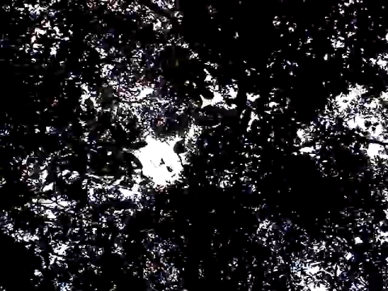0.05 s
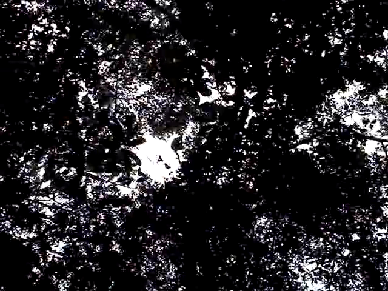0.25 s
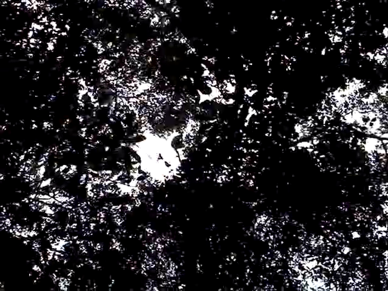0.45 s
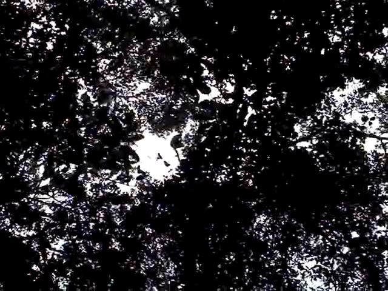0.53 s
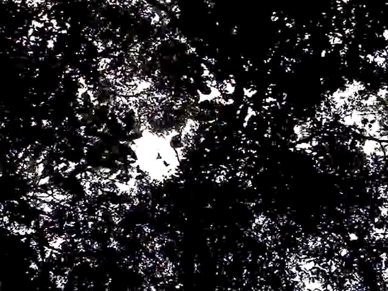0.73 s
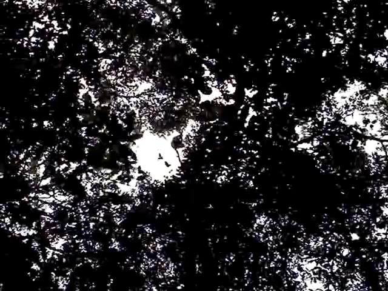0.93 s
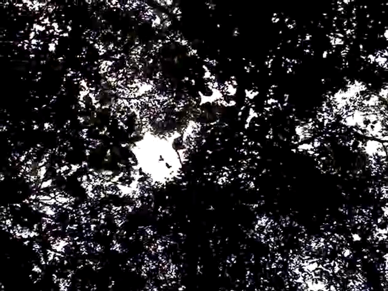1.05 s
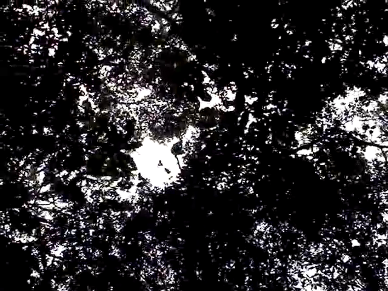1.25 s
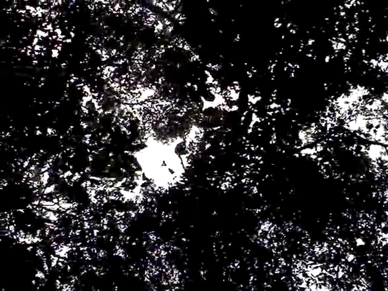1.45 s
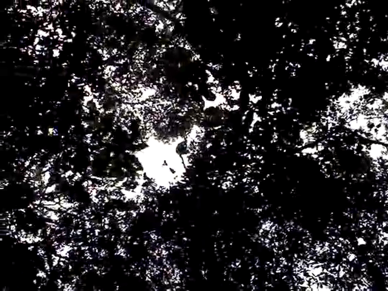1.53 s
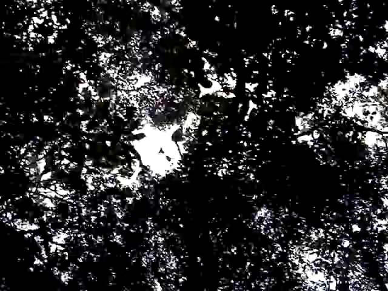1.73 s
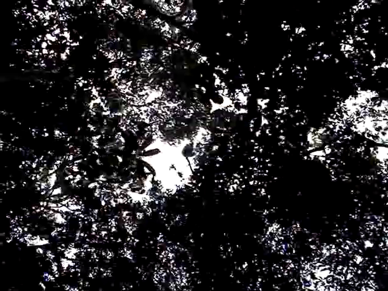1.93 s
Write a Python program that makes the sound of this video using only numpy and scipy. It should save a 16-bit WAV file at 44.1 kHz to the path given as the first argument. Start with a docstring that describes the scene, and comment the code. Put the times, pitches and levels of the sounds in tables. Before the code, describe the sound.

A lemur's loud, horn-like wail fills a quiet forest. Faint distant lemur calls fade at the start, and a sharp handling click comes at 0.2 seconds. The wail scoops up at about 0.4 seconds, holds one note, swells and lifts near 1.6, then breaks off, leaving an echo among the trees. From 1.7 seconds, small clicks and soft finger rubbing sound on the camera.

```python
"""An indri wails in a rain forest

An indri (a large lemur) gives one horn-like wail: it scoops up, holds its note, lifts and breaks off.
The trees scatter it into a long tail, and the calls of far indris linger over a soft forest hush.
A hand-held camera clicks and knocks a few times, and near the end fingers rub its casing."""
import sys
import numpy as np
from scipy import signal
from scipy.fft import rfft, irfft
from scipy.io import wavfile

SR = 44100
rng = np.random.default_rng(int(sys.argv[2]) if len(sys.argv) > 2 else 0)


def file_out(sig):
    """Save sig as 16-bit WAV at sys.argv[1]."""
    # one column per channel
    cols = np.atleast_2d(sig).T
    # limit, then scale
    lim = np.clip(cols, -1, 1)
    pcm = np.round(lim * 32767).astype(np.int16)
    wavfile.write(sys.argv[1], SR, pcm)


N = 88200
T = np.arange(N) / SR


def amp(db):
    """Turns decibels into a number to multiply by."""
    return 10 ** (np.asarray(db) / 20)


def unit(x):
    """Scales a signal to an average size (rms) of 1."""
    return x / np.sqrt(np.mean(abs(x) ** 2) + 1e-20)


def curve(points):
    """Joins (time [s], value) points by straight lines."""
    return np.interp(T, *np.transpose(points))


def spectrum(points, hz):
    """Reads between (frequency [Hz], value) points, with octaves evenly spaced."""
    f, value = np.transpose(points)
    return np.interp(np.log(hz + 1), np.log(f + 1), value)


def coloured(x, points):
    """Turns each frequency up or down as the points say, then scales to size 1."""
    gain = amp(spectrum(points, np.fft.rfftfreq(N, 1 / SR)))
    return unit(irfft(rfft(x) * gain, N))


def noise(points):
    """Noise of size 1 with the given colour (its balance of low and high)."""
    return coloured(rng.standard_normal(N), points)


def drift(rate_hz):
    """Random wandering of size 1, mostly slower than the given rate."""
    smoothing = 1 + (np.fft.rfftfreq(N, 1 / SR) / rate_hz) ** 2
    return unit(irfft(rfft(rng.standard_normal(N)) / smoothing, N))


def swell(start, rise):
    """Rises to 1 in the given time and dies away."""
    progress = np.maximum(T - start, 0) / rise
    return progress * np.exp(1 - progress)


def hush():
    """The soft, steady noise of the forest."""
    # colour of the hush (frequency [Hz], relative level [dB])
    colour = [(20, -4.5), (60, -13), (150, -6.5), (400, -4.5), (900, 2), (1300, -5), (1900, 2.5),
              (2500, -5), (4000, -12.5), (6300, -15), (8000, -18), (10000, -21.5)]
    return amp(-52.5) * noise(colour)


def far_calls():
    """Notes of distant indris, each with a weaker octave above, blurred by the trees."""
    # fading calls (start [s], pitch [Hz], level [dB], time to fade by 60 dB [s])
    calls = [(0, 998.7, -41.5, 0.81), (0, 862.8, -54, 3.7), (.07, 943.6, -48, 4.8),
             (.21, 1068, -43.5, 0.75), (.24, 1136, -55.5, 0.55), (.55, 902, -47.5, 1.5)]
    blur_hz, octave_db, rise_s = 16, -11.5, 0.0085
    out = np.zeros(N)
    for start, hz, db, fade_s in calls:
        age = np.maximum(T - start, 0)
        fade = np.minimum(age / rise_s, 1) * amp(-60 * age / fade_s)
        for k, gain in ((1, 1), (2, amp(octave_db))):
            blur = drift(k * blur_hz) + 1j * drift(k * blur_hz)  # wavers in level and pitch
            note = (blur * np.exp(2j * np.pi * k * hz * T)).real
            out += amp(db) * gain * fade * note
    return out


def clicks():
    """Each camera click is a short ring of the casing, a dry crack, a faint buzz and a low knock."""
    # clicks (start [s], ring level [dB], ring pitch [Hz], ring rise [s], crack [dB], knock [dB])
    hits = [(0.1812, -22, 3330, 0.00019, -32.5, -45.5), (0.2147, -4.5, 3225, 0.00039, -20, -42),
            (0.2167, -7.5, 3353, 0.00099, -14.5, -33), (1.1746, -37, 3794, 0.000343, -27.5, -51.5),
            (1.7443, -26, 2890, 0.0003835, -16, -57), (1.748, -17.5, 2555, .0004, -27, -49.5),
            (1.7878, -18.5, 3000, 0.0002, -31.5, -42.5), (1.7986, -22, 4468, 0.000186, -20, -28.5),
            (1.9495, -37, 2966, 0.000315, -36.5, -44)]
    # colours of the crack and the buzz (frequency [Hz], relative level [dB])
    crack_colour = [(20, -41), (60, -22.5), (200, -20), (1200, -5), (2400, 2.5), (4500, 1), (6000, -5.5),
                    (8000, -8.5), (10000, -18)]
    buzz_colour = [(100, -40.5), (1800, -11.5), (2500, -3), (3050, 0.5), (3700, -9), (4500, -16.5),
                   (10000, -31)]
    crack_fade_s, buzz_fade_s, buzz_vs_ring_db = 0.001435, 0.032, -35.5
    knock_hz, knock_rise_s = 248, 0.00111
    out = np.zeros(N)
    for start, ring_db, ring_hz, ring_rise_s, crack_db, knock_db in hits:
        age = np.maximum(T - start, 0)
        ring = amp(ring_db) * swell(start, ring_rise_s) * np.sin(2 * np.pi * ring_hz * age)
        crack = amp(crack_db) * np.exp(-age / crack_fade_s) * noise(crack_colour)
        buzz = amp(ring_db + buzz_vs_ring_db) * np.exp(-age / buzz_fade_s) * noise(buzz_colour)
        knock = amp(knock_db) * swell(start, knock_rise_s) * np.sin(2 * np.pi * knock_hz * age)
        out += (T >= start) * (ring + crack + buzz + knock)
    return out


def forest_echoes(sound):
    """Near trunks send back a short burst of echoes; the trees beyond add a long tail."""
    # length of the tail (frequency [Hz], time to fade by 60 dB [s])
    fade_times = [(300, .9), (600, 1.48), (1250, 1.0), (2500, 1.0), (6000, 1.5), (10000, 0.01)]
    # colour of the echoes (frequency [Hz], gain [dB])
    colour = [(150, -19), (600, -14.5), (1250, -8.5), (1900, -8), (2700, -6), (4000, -5.5), (7000, -4.5)]
    near_db, near_span_s, build_up_s = -2, 0.127, 0.034
    # noise, split into frequency bands and faded, stands for the echoes of one sharp tap
    hz, t, bands = signal.stft(rng.standard_normal(N), SR, nperseg=256)
    near = amp(near_db) * np.exp(-(t / near_span_s) ** 4)
    beyond = amp(-60 * t / spectrum(fade_times, hz)[:, None])
    faded = bands * (near + beyond)
    tinted = faded * amp(spectrum(colour, hz))[:, None]
    _, waves = signal.istft(np.array([faded, tinted]), SR, nperseg=256)
    plain, echoes = waves[:, :N] * np.minimum(T / build_up_s, 1)
    return signal.fftconvolve(sound, echoes / np.linalg.norm(plain))[:N]


def bumps():
    """The hand nudges the camera: a cycle or two of deep rumble."""
    # nudges (start [s], level [dB])
    nudges = [(.21, -44), (1.09, -53), (1.409, -54), (1.485, -57), (1.56, -58), (1.785, -64)]
    pitch_hz, rise_s = 30, 0.014
    return sum(amp(db) * swell(start, rise_s) * np.sin(2 * np.pi * pitch_hz * (T - start))
               for start, db in nudges)


def wail():
    """The voice is a stack of harmonics (multiples of one pitch) plus air rushing through the throat."""
    # tune of the wail (time [s], pitch [Hz])
    pitch = [(.345, 462), (.37, 475.7), (.381, 564.9), (.392, 612.7), (.44, 612.6), (.55, 602.6),
             (.72, 600.2), (.9, 600.6), (1.1, 605.7), (1.32, 610.5), (1.5, 618.9), (1.56, 628.3),
             (1.59, 649.1), (1.615, 690.2), (1.645, 703.8), (1.66, 642.2), (1.685, 471.9)]
    # hoarseness as the voice starts and breaks (time [s], extra pitch shake [share of the pitch])
    hoarseness = [(.35, .025), (.39, .018), (.42, 0.00297), (.6, 0.00125), (.72, 0.00017), (1.35, 0),
                  (1.55, .002), (1.6, 0.0067), (1.65, 0.0204), (1.68, 0.0686)]
    # each main harmonic swells and fades as the wail is heard through the trees (time [s], level [dB])
    first = [(.39, -25), (.46, -20.5), (.62, -26.5), (.8, -22), (1.08, -20), (1.17, -24), (1.26, -20),
             (1.46, -20.5), (1.56, -25), (1.63, -24.5)]
    second = [(.41, -22), (.58, -30), (.67, -24.5), (.8, -28.5), (.92, -21), (1.05, -23), (1.1, -15),
              (1.22, -17.5), (1.265, -33), (1.29, -36), (1.32, -25), (1.41, -17), (1.51, -10.5),
              (1.6, -16.5), (1.64, -26)]
    third = [(.35, -5.5), (.38, -31.5), (.42, -31), (.49, -31.5), (.62, -26), (.98, -22), (1.2, -27),
             (1.29, -34.5), (1.39, -22.5), (1.5, -30.5), (1.63, -30.5)]
    fourth = [(.355, -51.5), (.375, -31.5), (.42, -47.5), (.52, -37.5), (.65, -47.5), (.92, -48.5),
              (1.15, -41.5), (1.25, -34), (1.35, -49), (1.42, -35.5), (1.54, -42), (1.63, -31)]
    fifth = [(.36, -56.5), (.405, -29.5), (.46, -43.5), (.53, -23), (.62, -46), (.74, -27), (.85, -26.5),
             (.98, -31), (1.12, -25.5), (1.24, -37), (1.32, -29), (1.45, -37), (1.63, -38)]
    seventh = [(.375, -55.5), (.405, -41.5), (.6, -46), (.86, -56), (1, -44.5), (1.2, -42.5), (1.36, -37.5),
               (1.5, -41.5), (1.63, -45)]
    # the weaker, brassy harmonics (frequency [Hz], level [dB])
    brass_colour = [(3600, -51.5), (4800, -47.5), (5400, -45.5), (6000, -42.5), (6650, -46), (7250, -53.5),
                    (7900, -65), (9600, -77), (11000, -81)]
    # their shared rise and fall (time [s], gain [dB])
    brass_gain = [(.36, -32.5), (.42, 0), (.58, 1), (.78, -2), (1.05, 0.5), (1.4, -0.5), (1.55, -1.5),
                  (1.63, -2)]
    # colour of the rushing air (frequency [Hz], relative level [dB])
    air_colour = [(100, -48.5), (330, -29.5), (450, -6), (600, -3), (950, 1), (1300, -0.5), (1850, 3.5),
                  (2250, -12.5), (2600, -4.5), (3050, 1), (3700, -5.5), (4200, -14.5), (4900, -3.5),
                  (5800, -1.5), (6800, -3), (7600, -22.5), (10000, -30.5)]
    # strength of that air (time [s], level [dB])
    air_level = [(.37, -41), (.55, -45), (.78, -43.5), (1.1, -42.5), (1.45, -42), (1.58, -45.5),
                 (1.66, -26.5)]
    shake_share, shake_hz, flicker_depth, flicker_hz = 0.000883, 156, 0.56, 6.3
    start_s, scoop_s, scoop_db = 0.35916, 0.0476, -17
    break_s, break_db_per_s = 1.6261, 276.5

    hz = curve(pitch) * (1 + (shake_share + curve(hoarseness)) * drift(shake_hz))
    phase = 2 * np.pi * np.cumsum(hz) / SR
    main = {1: first, 2: second, 3: third, 4: fourth, 5: fifth, 7: seventh}
    voice = amp(curve(air_level)) * noise(air_colour)
    for k in range(1, 17):
        if k in main:
            level = amp(curve(main[k]))
        else:
            flicker = 1 + flicker_depth * drift(flicker_hz)
            level = amp(spectrum(brass_colour, k * hz) + curve(brass_gain)) * flicker
        voice += np.sqrt(2) * level * np.sin(k * phase + 2 * np.pi * rng.random())
    # a quick fade at each end turns all the levels above down to silence
    opening = np.clip((T - start_s) / scoop_s, 0, 1)
    fade_in = np.minimum(opening * 10, 1) * amp(scoop_db * (1 - opening))
    fade_out = amp(-break_db_per_s * np.maximum(T - break_s, 0))
    return fade_in * fade_out * voice


def finger_rub():
    """As the grip shifts, fingers rub the casing in many tiny slips of uneven size."""
    # strength of the rubbing (time [s], level [dB])
    level = [(1.6, -67), (1.68, -43.5), (1.77, -40.5), (1.83, -39), (1.9, -48.5), (2, -53.5)]
    # colour of the slips (frequency [Hz], relative level [dB])
    colour = [(30, -44.5), (120, -24.5), (300, -8), (900, 5), (1800, 6), (2800, 1), (4000, -2), (6300, 0.5),
              (7500, -15), (10000, -22.5)]
    slips_per_s, spread_db = 3000, 5.5
    slips = (rng.random(N) < slips_per_s / SR) * rng.choice([-1, 1], N)
    sizes = amp(spread_db * np.minimum(rng.exponential(1, N), 4))
    return amp(curve(level)) * coloured(slips * sizes, colour)


def scene():
    """Mixes everything into one channel; the wail and, faintly, the clicks echo among the trees."""
    voice, ticks = wail(), clicks()
    echoes = forest_echoes(voice + amp(-25) * ticks)
    return (voice + ticks + echoes + far_calls() + finger_rub() + bumps() + hush())[None]


def record(dry):
    """A limiter holds down the loudest swells, then a filter cuts the highest treble."""
    limit_db, averaging_s, cutoff_hz = -12.5, 0.02, 9950
    memory = np.exp(-1 / (averaging_s * SR))
    power = signal.lfilter([1 - memory], [1, -memory], dry ** 2)
    level = np.sqrt(power + 1e-12)
    held = dry / np.maximum(level / amp(limit_db), 1)
    treble_cut = signal.firwin(801, cutoff_hz, window=("kaiser", 9), fs=SR)
    return signal.oaconvolve(held, treble_cut[None], "same")


dry = scene()
out = record(dry)
file_out(out)
```